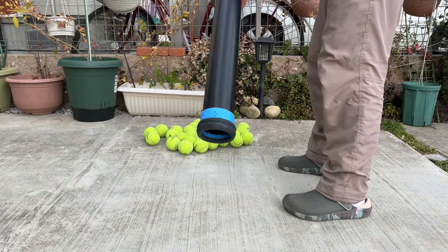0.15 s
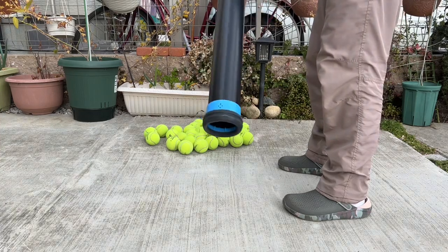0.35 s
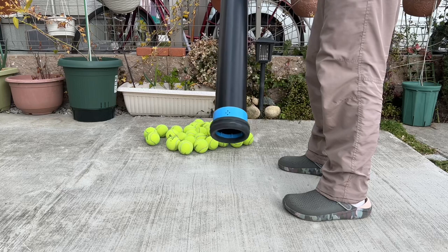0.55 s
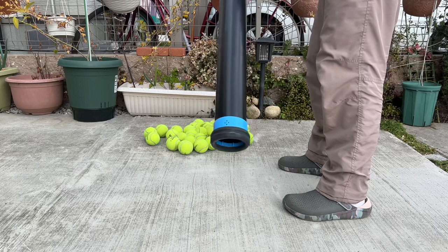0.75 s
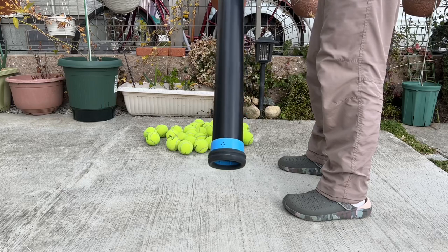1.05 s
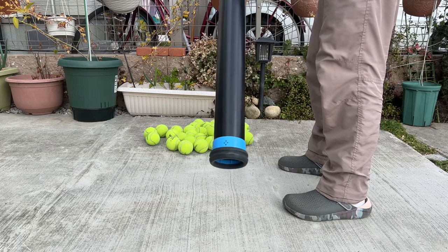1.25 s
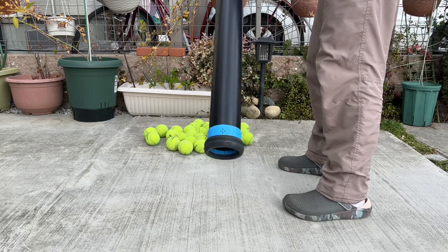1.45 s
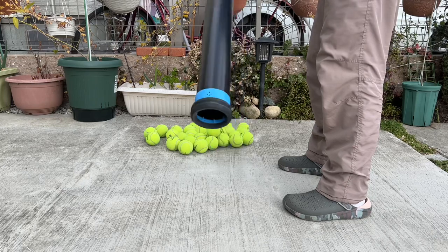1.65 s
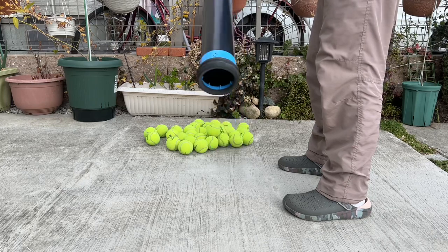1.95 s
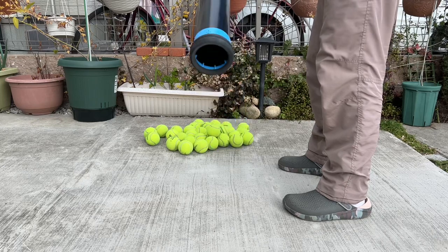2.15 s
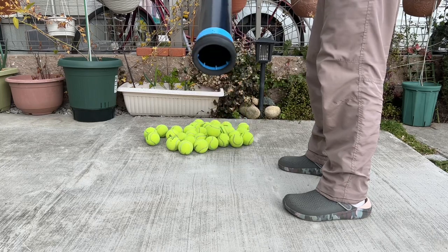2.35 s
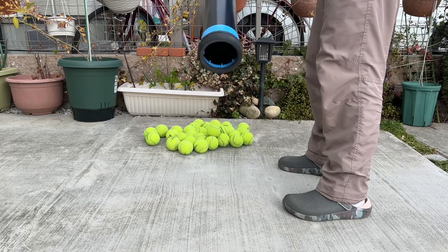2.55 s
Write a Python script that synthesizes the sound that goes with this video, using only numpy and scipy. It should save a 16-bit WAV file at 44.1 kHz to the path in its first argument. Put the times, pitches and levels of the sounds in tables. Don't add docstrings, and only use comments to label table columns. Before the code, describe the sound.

Close up outdoors, a short felt scrape ends in one sharp, hollow plastic knock with a rattle; near quiet with faint rustling, then wind buffets the microphone and a second, much softer knock sounds.

```python
import sys
import numpy as np
from scipy import signal
from scipy.fft import rfft, irfft, next_fast_len
from scipy.io import wavfile
from scipy.ndimage import map_coordinates

SR = 44100
rng = np.random.default_rng(int(sys.argv[2]) if len(sys.argv) > 2 else 0)


def waveform_to_disk(signal):
    frames = np.transpose(np.atleast_2d(signal))
    scaled = np.clip(frames, -1, 1) * 32767
    samples = np.round(scaled).astype(np.int16)
    wavfile.write(sys.argv[1], SR, samples)


def rack_gain(trim_db):
    fader = np.asarray(trim_db, float)
    return 10 ** (fader / 20)


N = 119070
T = np.arange(N) / SR

# frequency in Hz, level in dB.
GARDEN = [(40, -23.5), (91, -5), (207, -7), (500, -12.5), (1200, -22), (2300, -34.5), (3800, -46.5),
          (15500, -56.5)]
# frequency in Hz, side over mid in dB.
WIDTH = [(40, -14), (125, -16), (500, -6), (1500, 0), (4000, -10), (12000, -9.5)]
# time in seconds, strength in dB.
BREEZE = [(0.0, -50.5), (0.22, -59), (.36, -67), (0.46, -46.5), (.66, -52.5), (1.39, -63.5), (2.04, -52),
          (2.2, -39), (2.26, -41), (2.38, -53.5), (2.58, -52), (2.7, -57.5)]
# frequency in Hz, level in dB.
BUFFET = [(20, -20), (40, 2.5), (75, 3), (130, 2.5), (250, -21), (400, -60.5)]
GARDEN_DB = -57.5

# start in seconds, attack, hold and release in seconds, level in dB.
RUSTLES = [
    (-.02, 0.013, 0.013, 0.095, -61.5),
    (0.622, 0.022, 0.074, 0.035, -82.5),
    (.735, 0.051, 0.12, 0.11, -65),
    (1.473, 0.039, 0.051, 0.15, -70),
]
# start in seconds, attack, hold and release in seconds, level in dB.
CREASES = [
    (1.62, .13, 0.053, 0.068, -72.5),
    (2.165, 0.0062, .055, 0.021, -74.5),
    (2.5, 0.035, 0.043, 0.044, -89),
    (2.59, .03, 0.055, 0.061, -82.5),
]
# frequency in Hz, level in dB.
CLOTH = [(1000, -7.5), (2500, -11), (5700, -13), (6900, -1.5), (8800, -14), (11900, -5), (14200, -7.5),
         (15500, -18)]
# frequency in Hz, level in dB.
CREASE = [(1200, -23), (3000, -0.5), (3900, -1), (4600, -4), (6300, -4), (8000, -6.5), (13000, 3),
          (15500, -8)]
# frequency in Hz, side over mid in dB.
NEAR = [(100, -17), (600, -16), (1500, -18), (4000, -9), (10000, -1.5), (15000, -3.5)]
FLUTTER_DB = 1.2

# time in seconds, level in dB, treble brightness in dB.
FIRST_SLIDE = [(.08, -76, 0), (.1, -50, 4.5), (.132, -41.5, -1.5), (.165, -46, 2), (.205, -39.5, 9),
               (.224, -36, 15), (.25, -26, -2.5), (.3, -51.5, -2.5), (.42, -60.5, -19), (.72, -76, -33)]
SECOND_SLIDE = [(2.368, -78, 5.5), (2.381, -44.5, 4), (2.39, -39, -0.5), (2.411, -44, -1),
                (2.427, -30.5, 3), (2.439, -37.5, -14), (2.471, -61.5, -3.5), (2.56, -87.5, 6.5)]
# frequency in Hz, level in dB.
FIRST_FELT = [(120, -14.5), (500, -6), (1000, -4), (1700, -0.5), (2400, -5), (4000, -22.5), (8500, -37.5),
              (15500, -35.5)]
SECOND_FELT = [(100, -6.5), (250, 0), (1000, 7.5), (3000, -7), (5000, -23.5), (15500, -24)]
# frequency in Hz, level in dB.
SHEEN = [(1500, -36), (3000, -6.5), (5000, -9), (8000, -11.5), (12500, -9), (15500, -17)]
HOLLOW_DB, HOLLOW_WIDE_HZ = -1.5, 25.5

# time in seconds, peak in dB, pitch in Hz, length in seconds.
BLOWS = [(.23355, .6, 1750, .00038), (.2342, -15, 3300, .0004), (.2355, -11, 2500, .0004),
         (.2385, -12, 1500, .001), (.2397, -14, 700, .0025), (.2443, -15, 800, .001),
         (.2459, -13, 1900, .0009), (.2478, -15, 1000, .001), (.2484, -22, 3000, .0007),
         (.2520, -14, 720, .0022), (.2590, -15, 760, .0018), (.237, -18, 1150, .002),
         (.2623, -26, 2600, .0006), (.2645, -17, 600, .0015), (.217, -33, 740, .006),
         (.111, -41, 1000, .005), (.184, -42, 725, .005), (.13, -42, 1650, .006), (2.208, -60, 2000, .0004),
         (2.4285, -26, 950, .0012), (2.4330, -18, 670, .002), (2.4365, -25, 1150, .002),
         (2.4345, -28, 540, .003), (2.494, -50, 1200, .005), (2.445, -34, 780, .006),
         (.771, -50, 3000, .00015), (1.502, -55, 3000, .00015), (2.179, -53, 2400, .0003),
         (1.16, -56, 1200, .001)]
# time in seconds, level in dB, 60 dB decay in seconds.
RATTLES = [
    (0.2336, -18, 0.048),
    (0.2443, -25.5, 0.066),
    (0.2582, -33, .12),
    (0.259, -46, 0.77),
    (.118, -48.5, 0.2),
    (2.43, -42.5, 0.058),
    (2.44, -61, 0.69),
]
# frequency in Hz, level in dB.
RATTLE = [(500, -29), (1000, 4.5), (1600, 2.5), (2500, -4.5), (3400, -3.5), (4200, -16.5), (6000, -30.5),
          (10000, -69)]

# time in seconds,
# peak in dB, pitch in Hz, length in seconds.
THUMPS = [(.44, -38.5, 63.5, 0.015), (.172, -43, 141, 0.022), (.61, -49, 142, 0.014), (.585, -35, 66, 0.01),
          (.645, -34.5, 74, 0.0083), (.684, -29.5, 71, 0.016), (.75, -45, 73.5, 0.0077),
          (.81, -47, 71, 0.013), (.89, -41, 70, 0.019), (.925, -42.5, 91.6, 0.011),
          (1.05, -49, 80.3, 0.016), (1.7, -50, 64, 0.045), (1.78, -52.5, 58.8, 0.026),
          (2.04, -21.5, 69.7, 0.0055), (2.065, -26.5, 55, 0.03), (2.106, -17, 74.7, 0.01),
          (2.135, -29.5, 58.4, 0.011), (2.165, -20, 60.5, 0.012), (2.198, -28, 65, 0.016),
          (2.258, -21.5, 118.8, 0.0056), (2.29, -24, 74.2, 0.0081), (2.325, -35.5, 64.8, 0.026),
          (2.36, -32.5, 70.4, 0.014), (2.405, -34.5, 54, 0.016), (2.55, -55, 68, 0.032),
          (.661, -37, 130, 0.0075), (2.096, -32, 182, 0.0053), (2.186, -33, 193, 0.0029),
          (2.262, -38.5, 231, 0.0014), (2.387, -29, 168, 0.0049), (2.416, -29.5, 150, 0.0013),
          (2.402, -33.5, 110, 0.0042)]

# time in seconds, level in dB, build-up in seconds.
RINGS = [
    (.2411, -11, 0.0082),
    (2.431, -26.5, 0.0058),
]
COLUMN_HZ = [138.5, 242, 376.5, 483, 645, 737, 1107, 1206]
# level in dB, 60 dB decay in seconds.
FIRST_COLUMN = [(-13.5, 0.56), (-21.5, 0.91), (-5.5, 0.31), (-9.5, .3), (8, 0.066), (7, 0.064),
                (-16.5, 0.0975), (-2, 0.095)]
SECOND_COLUMN = [(-15, 0.26), (-10.5, 0.16), (-13.5, 0.41), (-2, 0.24), (0, 0.11), (-0.5, 0.11),
                 (-29, 0.058), (-6.5, 0.087)]
# time in seconds, level in dB, build-up in seconds.
STRIKES = [
    (0.2471, -25, 0.0046),
    (2.431, -33.5, 0.0065),
]
# frequency in Hz, level in dB, 60 dB decay in seconds.
FIRST_SHELL = [(131.9, -3.5, 0.34), (745, -5.5, 0.23), (960, -11.5, 0.43), (1280, -14, 0.3),
               (1370, -6, 0.11), (1475, -3, 0.092), (1600, -5.5, 0.16), (1776, -8.5, 0.12),
               (2010, -13, 0.11), (2293, -8, 0.15), (2830, -16.5, .45), (655, -14.5, 0.62)]
SECOND_SHELL = [(1174, -21, 0.36), (1280, -25, 0.24), (1260, -12.5, 0.33), (1830, -20, 0.17),
                (2140, -26, 0.15), (2730, -18, .12)]
WANDER = 1.3

# frequency in Hz, level in dB.
ECHO = [(300, -17.5), (620, -7), (900, -10), (1250, -5.5), (1700, -21.5), (2500, -16.5), (5000, -26.5)]
ECHO_S, ECHO_DB = .0114, -9
FAR_S, FAR_DB = .085, -21
# frequency in Hz, 60 dB decay in seconds.
WALLS = [(200, 0.52), (1000, 0.84), (3000, 0.17), (6000, 0.55), (9000, 0.092), (15000, 0.22)]
# frequency in Hz, level in dB.
WALL_TONE = [(300, -5.5), (700, -2), (1150, -4.5), (1900, -2.5), (3200, 10.5), (6000, 3.5)]
WALLS_DB, WALL_DELAY_S = -24, .012

# frequency in Hz, level in dB.
MID_NOTCH = [(8600, -2), (9300, -18), (10000, -39), (10700, -31.5), (11300, -5.5)]
# frequency in Hz, level in dB.
SIDE_NOTCH = [(5800, 4), (7000, -26), (8400, 0.5), (12200, -6), (12900, -20), (14200, -17.5), (14900, -6)]
LEAK_DB = -12.5
TOP_HZ = 15760


def along(points, hz):
    f, v = np.transpose(points)
    return np.interp(np.log(hz + 1), np.log(f + 1), v)


def filtered(x, response):
    m = next_fast_len(N + 8192)
    return irfft(rfft(x, m) * response(np.fft.rfftfreq(m, 1 / SR)), m)[..., :N]


def wobble(rate):
    knots = rng.standard_normal(N // 40)[:int(N * rate / SR) + 4]
    return map_coordinates(knots, [T * rate])


def rush(spectrum, width):
    def response(hz):
        return rack_gain(along(spectrum, hz)) * np.array([hz * 0 + 1, rack_gain(along(width, hz))])
    pair = filtered(rng.standard_normal((2, N)), response)
    return pair / np.sqrt(np.mean(pair[0] ** 2))


def placed(x, lean, lag_s):
    return np.array([x, lean * x + lag_s * SR * np.gradient(x)])


def bursts(rows):
    out = np.zeros(N)
    for s, db, hz, length in rows:
        span = slice(max(0, round((s - 5 * length) * SR)), round((s + 5 * length) * SR))
        t = T[span] - s
        out[span] += rack_gain(db) * np.exp(-(t / length) ** 2) * np.cos(2 * np.pi * hz * t)
    return out


def garden():
    breath = rack_gain(GARDEN_DB + 0.58 * wobble(3) + .8 * wobble(17))
    hum = breath * rush(GARDEN, WIDTH)
    strength = np.interp(T, *np.transpose(BREEZE)) + 1.8 * wobble(4.0)
    return hum + rack_gain(strength) * rush(BUFFET, [(60, -13.0)])


def brush(rows, colour):
    gain = np.zeros(N)
    for s, attack, hold, release, db in rows:
        corners = np.cumsum([s, attack, hold, release])
        gain += rack_gain(db + np.interp(T, corners, [-16.5, 5.5, 1.5, -22.5], left=-90, right=-90))
    flutter = rack_gain(FLUTTER_DB * (wobble(21) + wobble(160)))
    return gain * flutter * rush(colour, NEAR)


def rustles():
    return brush(RUSTLES, CLOTH) + brush(CREASES, CREASE)


def slide(rows, felt):
    s, level, bright = np.transpose(rows)
    db = np.interp(T, s, level, left=-120, right=-120) + 1.1 * wobble(300)

    def hollow(f):
        peaks = sum(1 / (1 + ((f - hz) / HOLLOW_WIDE_HZ) ** 2) for hz in COLUMN_HZ)
        return 1 + rack_gain(HOLLOW_DB) * peaks
    scrape = filtered(rush(felt, NEAR), hollow)
    sheen = rack_gain(np.interp(T, s, bright) - 10) * rush(SHEEN, NEAR)
    return rack_gain(db) * (scrape + sheen)


def blows():
    return bursts(BLOWS)


def rattle():
    gain = sum(rack_gain(db - 60 * np.clip(T - s, 0, None) / t60) * (T > s) for s, db, t60 in RATTLES)
    return gain * rack_gain(3 * wobble(600)) * rush(RATTLE, NEAR)


def wind_thumps():
    return placed(bursts(THUMPS), .01, 0.0002)


def ring(s, db, rise, modes, wander=0):
    t = np.clip(T - s, 0, None)
    total = np.zeros(N)
    for hz, level, t60 in modes:
        phase = 2 * np.pi * hz * t + wander * hz / 1000 * wobble(90)
        total += rack_gain(level - 60 * t / t60) * np.sin(phase)
    return rack_gain(db) * (1 - np.exp(-t / rise)) * total


def column():
    out = np.zeros(N)
    for row, modes in zip(RINGS, (FIRST_COLUMN, SECOND_COLUMN)):
        out += ring(*row, [(hz, *mode) for hz, mode in zip(COLUMN_HZ, modes)])
    for row, modes in zip(STRIKES, (FIRST_SHELL, SECOND_SHELL)):
        out += ring(*row, modes, WANDER)
    return out


def echo(x):
    def response(hz):
        early = rack_gain(ECHO_DB) * np.exp(-2j * np.pi * hz * ECHO_S)
        late = rack_gain(FAR_DB) * np.exp(-2j * np.pi * hz * FAR_S)
        return rack_gain(along(ECHO, hz)) * (early - late)
    side = filtered(x, response)
    return np.array([0 * side, side])


def walls(x):
    hz, t, z = signal.stft(rng.standard_normal((2, SR)), SR, nperseg=256)
    t60 = np.clip(along(WALLS, hz), .03, 3)[:, None]
    tail = signal.istft(z * rack_gain(-60 * t / t60), SR, nperseg=256)[1]
    tail = np.pad(tail / np.linalg.norm(tail[0]), ((0, 0), (round(WALL_DELAY_S * SR), 0)))
    tail = tail * rack_gain([[0], [-5]])
    answer = signal.fftconvolve(x[None], tail, axes=1)[:, :N]
    return filtered(answer, lambda f: rack_gain(along(WALL_TONE, f)))


def ports(hz):
    return rack_gain([along(MID_NOTCH, hz), along(SIDE_NOTCH, hz)])


def scene():
    first = slide(FIRST_SLIDE, FIRST_FELT)
    second = slide(SECOND_SLIDE, SECOND_FELT)
    knock = blows() + column()
    pair = garden() + rustles() + first + second + rattle() + wind_thumps()
    pair += placed(knock, -.04, .00001) + echo(knock)
    pair += rack_gain(WALLS_DB) * walls(knock + first[0] + second[0])
    leak = rack_gain(LEAK_DB) * filtered(second, lambda hz: 1 - ports(hz))
    mid, side = filtered(pair, ports) + leak
    return np.array([mid + side, mid - side])


def low_pass(x):
    return signal.sosfilt(signal.butter(12, 15750, fs=SR, output="sos"), x)


def record(dry):
    mix = filtered(dry, lambda hz: hz < TOP_HZ)
    return low_pass(mix)


dry = scene()
out = record(dry)
waveform_to_disk(out)
```